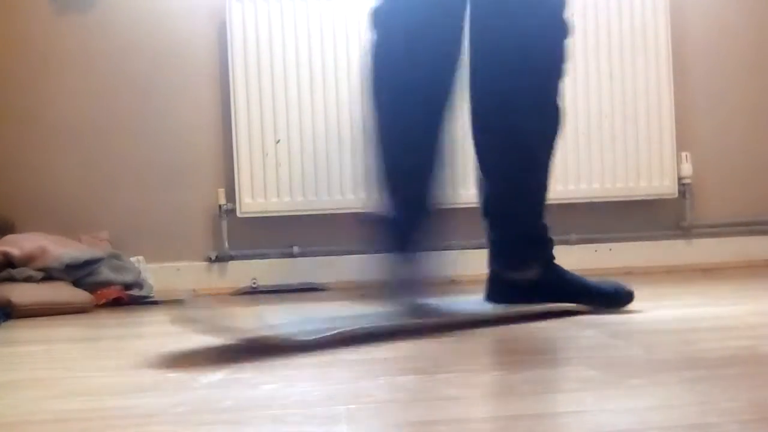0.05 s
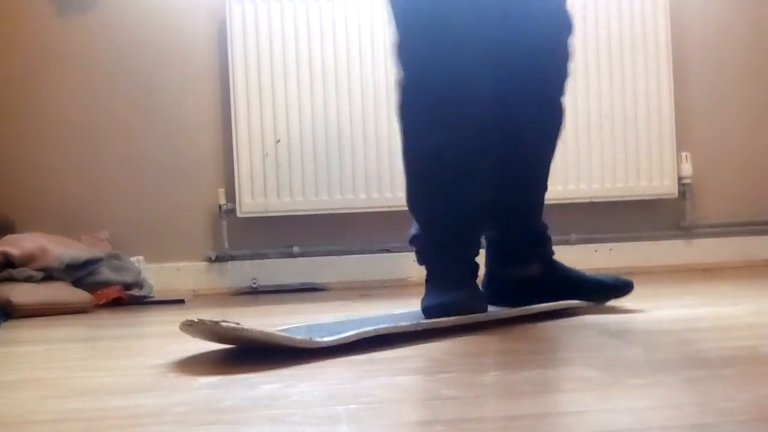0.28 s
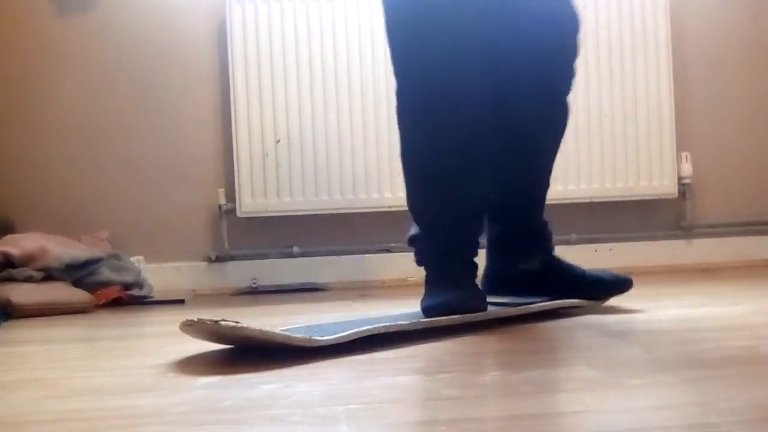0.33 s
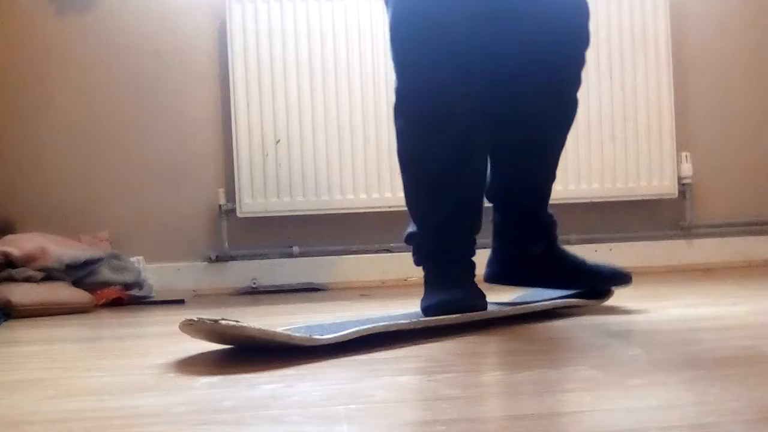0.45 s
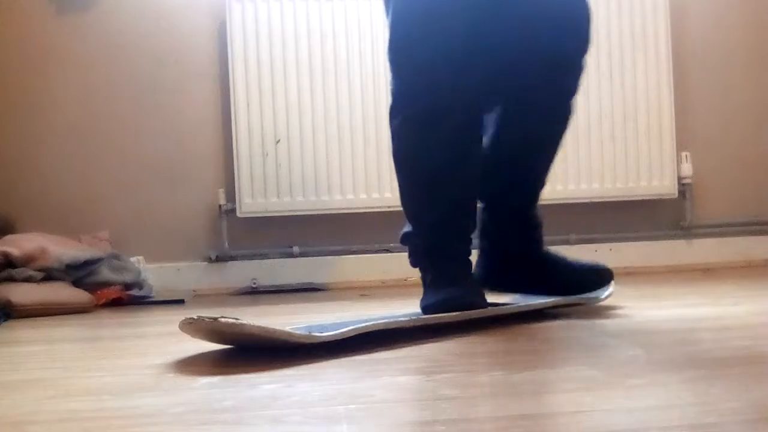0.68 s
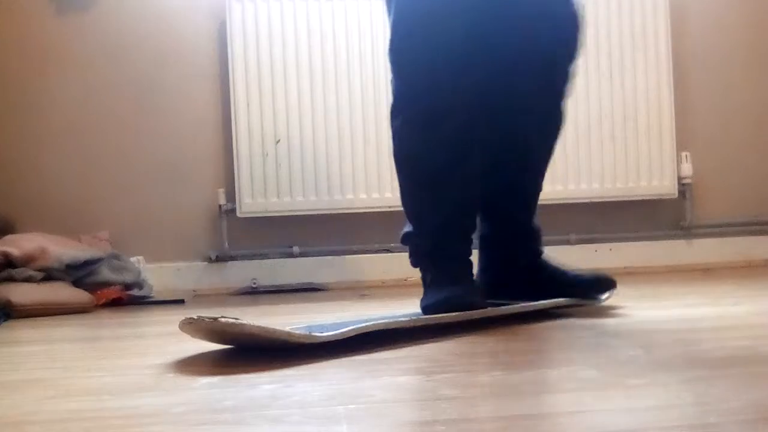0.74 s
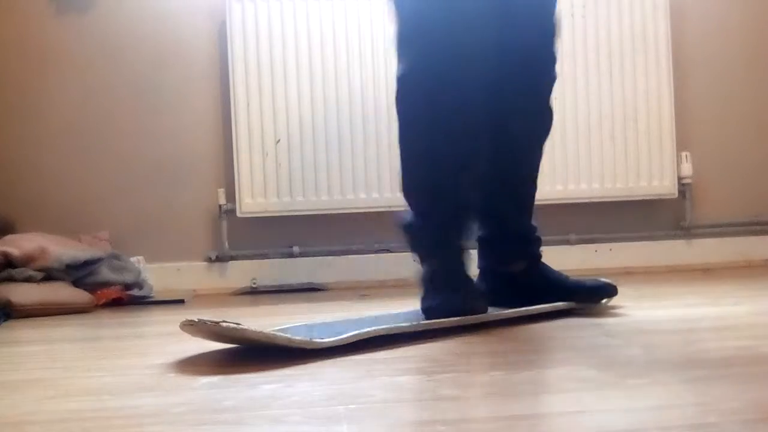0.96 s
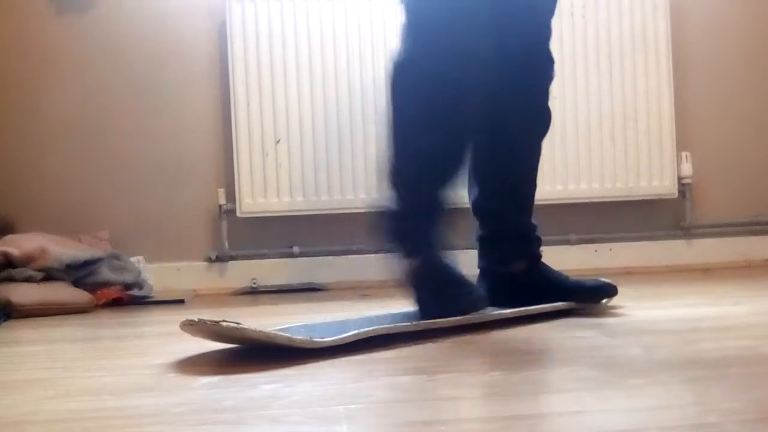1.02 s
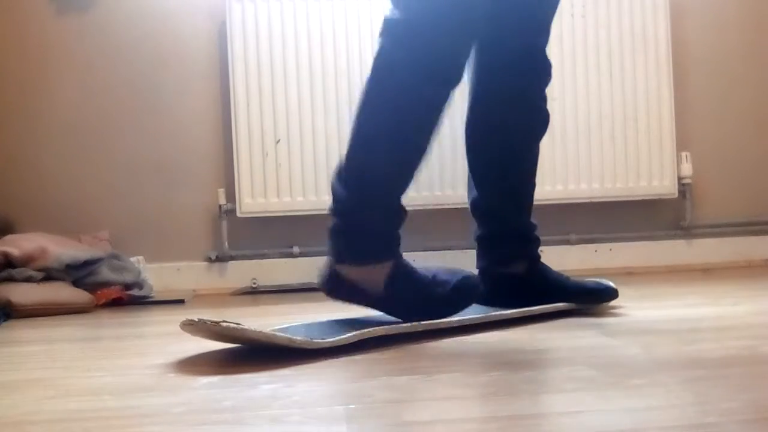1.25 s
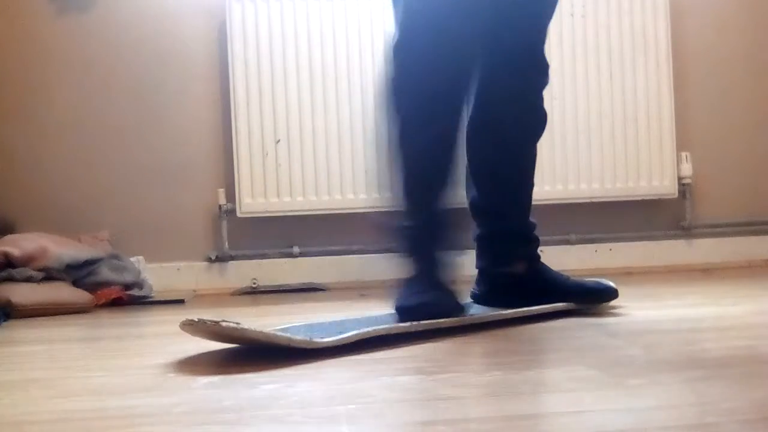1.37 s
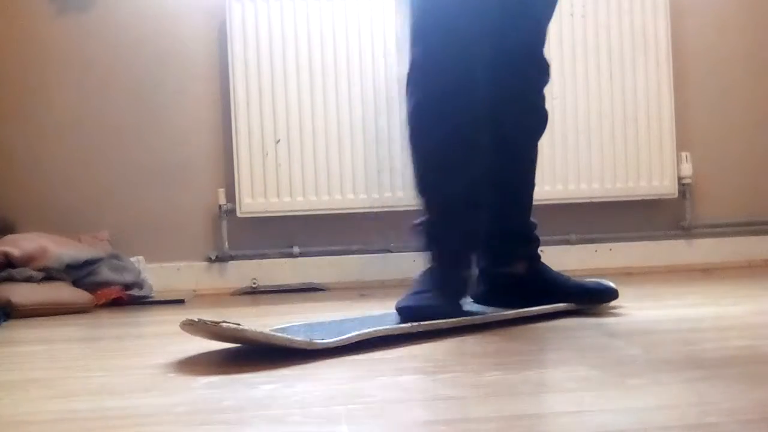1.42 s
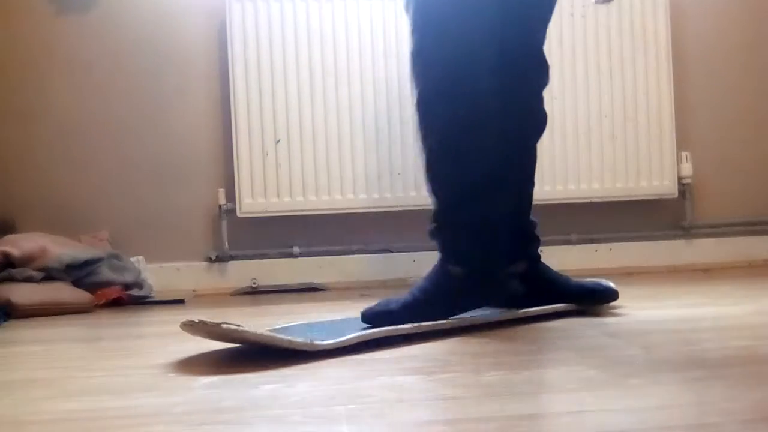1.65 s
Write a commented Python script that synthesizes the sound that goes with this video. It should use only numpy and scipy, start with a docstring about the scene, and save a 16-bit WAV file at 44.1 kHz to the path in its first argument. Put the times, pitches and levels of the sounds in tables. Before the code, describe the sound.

A bare wooden skateboard deck clatters on a hard floor in a small room. A sole scuffs its gritty top at 0 s, then six hard, woody knocks rattle together at 0.12-0.17 s. The underside scrapes to rest until about 0.75 s, with a soft double tap at 0.78 s. A short squeaky scuff follows at 1.1 s, then a stronger one at 1.36-1.7 s with a faint footfall. Steady hiss and a thin, faint whine continue throughout.

```python
"""A bare wooden skateboard deck on a hard floor in a small room, over steady hiss and a thin wavering whine.
At once a sole drags on the gritty top: uneven noise rings deck modes, and catches sing as brief tones.
The deck clatters down in a quick run of six blows, each a first contact and its rattle exciting modes.
Its underside slides to rest as noise through sagging modes, and it taps once more in a close pair of blows.
Then the sole drags twice again with further squeaks, a soft footfall sounding within the last drag."""
import sys
import numpy as np
from scipy import signal
from scipy.fft import rfft, irfft, next_fast_len
from scipy.io import wavfile
from scipy.ndimage import map_coordinates

SR = 44100
rng = np.random.default_rng(int(sys.argv[2]) if len(sys.argv) > 2 else 0)


def to_linear_factor(level_db):
    """Convert decibel levels (scalar or array-like) to linear amplitude factors."""
    exponent = np.asarray(level_db, float) / 20
    return 10 ** exponent


def generate_wav(sig):
    """Save sig (samples, or channels by samples) to the path in sys.argv[1] as 16-bit PCM at SR."""
    pcm = np.round(np.clip(np.atleast_2d(sig).T, -1, 1) * 32767).astype(np.int16)
    wavfile.write(sys.argv[1], SR, pcm)


N = 74970

# Levels are those given to each source, ahead of the room tail and the microphone.
# Steady hiss, relative spectrum: (frequency [Hz], level [dB])
HISS_SPECTRUM = [(20, -30), (60, -21.5), (150, 7), (700, -5.5), (1400, 8.5), (3000, -4.5), (6000, -1.5),
                 (12000, 8.5), (16000, -1.5)]
# Sole dragging on the grip, level before the tilt: (time [s], level [dB], brightness [dB/octave])
SCUFF_STROKE = [(0, -46.5, 2.5), (.05, -52.5, 0.5), (.092, -54.5, 1.5), (.104, -43, 2.5), (.15, -35, -4),
                (.25, -50, -2), (.36, -64, 5.5), (.9, -69, -5), (1.03, -74.5, 3.5), (1.07, -68, -1),
                (1.094, -56, -0.5), (1.104, -53.5, -0.5), (1.155, -53, 0.5), (1.2, -63.5, -1.5),
                (1.238, -78, 8), (1.262, -88, -6), (1.335, -75, -5), (1.356, -59, 0), (1.364, -51, -1.5),
                (1.4, -46.5, 0), (1.435, -42.5, 1), (1.48, -46.5, 1), (1.55, -50, 2.5), (1.62, -54.5, 0),
                (1.7, -63, 3.5)]
# Deck modes rung by the sole: (frequency [Hz], width [Hz], level [dB])
SCUFF_MODES = [(500, 56, -6.5), (720, 42, -11), (1196, 48, -6.5), (1350, 38, -2.5), (1586, 340, -4.5),
               (2390, 327, -5), (2900, 210, -6), (3480, 750, -11.5)]
# Modes that lead once the foot's weight has shifted: (frequency [Hz], width [Hz], level [dB])
SCUFF_LATE_MODES = [(528, 71, -2), (1266, 190, 3), (1734, 300, 1), (2550, 1100, -4), (3620, 740, -7)]
# Unresonated rubbing, relative spectrum: (frequency [Hz], level [dB])
RUB_SPECTRUM = [(100, -120), (250, -3), (500, 1), (1500, -0.5), (3000, -4), (6000, -11), (16000, -23)]
# Catches of the sole, mean pitch and level: (time [s], length [s], pitch [Hz], rms level [dB])
SQUEAK_EVENTS = [(0, 0.04, 2320, -56), (1.064, 0.0092, 2460, -63), (1.067, 0.0057, 1350, -62),
                 (1.094, 0.032, 1350, -52), (1.1, 0.019, 1186, -55), (1.112, 0.012, 500, -64),
                 (1.134, 0.023, 500, -62), (1.157, 0.0134, 539, -66.5), (1.209, 0.028, 1350, -64),
                 (1.356, 0.006, 1340, -51.5), (1.367, 0.012, 1350, -46.5), (1.385, 0.0091, 482.8, -49.5),
                 (1.409, 0.016, 1277, -48.5), (1.421, 0.014, 2480, -56)]
# Moments of the blows, deck on floor, and last a soft footfall: (time [s])
BLOW_TIMES = [.1184, .1343, .1512, .152, .1565, .166, .7737, .7853, 1.372]
# Blows, one per moment: (peak [dB], favoured mode region [Hz], low thud peak [dB],
# rattle decay time [s], crack peak relative to the blow [dB])
BLOWS = [(-21, 1360, -57, 0.00305, -7.5), (-29, 2000, -62, 0.0046, -32), (-15, 1790, -78, .012, -9),
         (-25, 600, -34.5, 0.00404, -41), (-25.5, 550, -52.5, .006, -42), (-26.5, 463, -43.5, .02, -37),
         (-35, 1080, -69.5, 0.0063, -36), (-37, 630, -61, 0.016, -40), (-45.5, 450, -63.5, 0.0338, -38)]
# Slow low modes of deck and floor: (frequency [Hz], width [Hz], level [dB])
THUD_MODES = [(174.3, 14.3, 3), (222.8, 12, 0.5), (344.6, 13.7, -3.5)]
# Struck deck modes, before weighting by region: (frequency [Hz], width [Hz], level [dB])
DECK_MODES = [(389.5, 15, 1.5), (484, 48, -3), (570, 84, -6), (660, 100, 4), (850, 480, 2), (1120, 140, -6),
              (1340, 126, 7.5), (1623, 65, 0), (1850, 350, -0.5)]
# Ring of the hard contact: (frequency [Hz], width [Hz], level [dB])
CRACK_MODES = [(4640, 1100, 5), (6870, 2300, 5), (12560, 17600, -3.5)]
# Underside rubbing the floor, level before the tilt: (time [s], level [dB], brightness [dB/octave])
SLIDE_STROKE = [(.12, -108, 13), (.2, -61, 9.5), (.34, -54, -5), (.4, -51, 1), (.435, -49, 0.5),
                (.47, -50.5, 1), (.53, -53.5, -0.5), (.57, -54.5, -3.5), (.6, -60.5, -1), (.63, -54, -2),
                (.65, -59, -1), (.685, -56.5, 2), (.72, -64.5, 6), (.77, -69, -3), (.84, -83, 0)]
# Deck modes rung at the start of the slide: (frequency [Hz], width [Hz], level [dB])
SLIDE_MODES = [(634, 107, -9.5), (830, 154, -7), (1160, 400, -12.5), (1728, 136, 0.5), (2196, 68, -2),
               (2740, 130, -12), (3506, 71, -13.5)]
# Reverberation time of the room: (frequency [Hz], time to fall 60 dB [s])
ROOM_T60 = [(150, 0.51), (500, 0.27), (1500, 0.43), (4000, 0.51), (10000, 0.34)]
# Microphone response: (frequency [Hz], gain [dB])
MIC_RESPONSE = [(20, 24.5), (90, 15), (170, 4), (5500, -2), (6500, -6), (7500, -18.5), (9000, -22),
                (13800, -25.5), (15000, -1.5), (15500, -18)]


def unit(x):
    """Normalisation: scales a signal to an rms of 1."""
    return x / np.sqrt(np.mean(x ** 2) + 1e-20)


def peak_unit(x):
    """Normalisation: scales a signal to a peak of 1."""
    return x / np.abs(x).max()


def along(points, hz):
    """Linear interpolation of a tabulated curve over logarithmic frequency."""
    f, value = np.transpose(points)
    return np.interp(np.log(hz + 1), np.log(f + 1), value)


def filtered(x, response):
    """Linear filtering: the spectrum is multiplied by a complex response of frequency."""
    size = next_fast_len(len(x) + SR // 2)
    spectrum = rfft(x, size) * response(np.fft.rfftfreq(size, 1 / SR))
    return irfft(spectrum, size)[:len(x)]


def modes(table, flip=-1):
    """Modal superposition: a causal sum of damped resonances; flip -1 alternates their signs."""
    def response(f):
        total = 0
        for k, (centre, width, db) in enumerate(table):
            damping = 1j * f * width
            total = total + flip ** k * to_linear_factor(db) * damping / (centre * centre - f * f + damping)
        return total
    return response


def low_pass(u):
    """Second-order Butterworth roll-off over the ratio u of frequency to cut-off."""
    return 1 / (1 - u * u + np.sqrt(2) * 1j * u)


def high_pass(u):
    """Second-order Butterworth rise over the ratio u of frequency to cut-off."""
    return -u ** 2 * low_pass(u)


def wobble(rate):
    """Band-limited random modulation: a smooth curve through Gaussian knots, rate of them a second."""
    knots = rng.standard_normal(int(N * 200 / SR) + 4)
    return map_coordinates(knots, [np.arange(N) * min(rate, 199) / SR])


def room(x, wet_db):
    """Reverberation: direct sound plus a delayed diffuse tail decaying by frequency."""
    first_wall_s = 0.0066
    hz, t, z = signal.stft(rng.standard_normal(SR // 2), SR, nperseg=256)
    decay = to_linear_factor(-60 * t / along(ROOM_T60, hz)[:, None])
    tail = signal.istft(z * decay, SR, nperseg=256)[1]
    tail = tail / np.linalg.norm(tail)
    delayed = np.pad(x, (round(first_wall_s * SR), 0))
    return x + to_linear_factor(wet_db) * signal.fftconvolve(delayed, tail)[:N]


def background():
    """Stationary shaped noise, and a sinusoid whose level and phase waver."""
    hiss_db, whine_hz, whine_db, whine_waver_db = -64, 6230, -78.5, 3
    hiss = unit(filtered(rng.standard_normal(N), lambda f: to_linear_factor(along(HISS_SPECTRUM, f))))
    waver = to_linear_factor(whine_waver_db * wobble(25.5))
    phase = 2 * np.pi * whine_hz * np.arange(N) / SR + 0.5 * wobble(35)
    whine = np.sqrt(2) * waver * np.sin(phase)
    return to_linear_factor(hiss_db) * hiss + to_linear_factor(whine_db) * whine


def grit(spread_db):
    """Asperity contact: dense noise whose strength steps unevenly every 8 samples."""
    strength = np.minimum(rng.exponential(size=N // 8 + 1), 4).repeat(8)[:N]
    return rng.standard_normal(N) * to_linear_factor(spread_db * strength)


def rubbing(stroke, ring, late_ring, shift_s, broad_db, above_hz, grit_db, catch_db):
    """Sliding friction: uneven grit noise partly rings the deck, its level and brightness set by the stroke."""
    s, level_db, tilt_db = np.transpose(stroke)
    seconds = np.arange(N) / SR
    grip = grit(grit_db) * to_linear_factor(catch_db * wobble(90))
    late = np.interp(seconds, shift_s, [0, 1])
    early_rung = unit(filtered(grip, modes(ring)))
    late_rung = unit(filtered(grip, modes(late_ring)))
    rung = (1 - late) * early_rung + late * late_rung
    scrape = grit(grit_db) * to_linear_factor(catch_db * wobble(40.5))
    broad = unit(filtered(scrape, lambda f: to_linear_factor(along(RUB_SPECTRUM, f))))
    hz, t, z = signal.stft(unit(rung + to_linear_factor(broad_db) * broad), SR, nperseg=512)
    octaves = np.log2(np.clip(hz, 200, 6000) / 1500)[:, None]  # the tilt pivots at 1500 Hz
    tilt = to_linear_factor(np.interp(t, s, tilt_db) * octaves)
    bass_cut = 1 + (above_hz / (hz[:, None] + 1)) ** 6
    rub = signal.istft(z * tilt / bass_cut, SR, nperseg=512)[1][:N]
    return to_linear_factor(np.interp(seconds, s, level_db, left=-120)) * rub


def scuff():
    """Friction of sole on grip; late in the last drag the shifted weight makes other modes lead."""
    return rubbing(SCUFF_STROKE, SCUFF_MODES, SCUFF_LATE_MODES, shift_s=(1.438, 1.53),
                   broad_db=-4.5, above_hz=300, grit_db=4.0, catch_db=3.0)


def squeaks():
    """Stick-slip tones: the sole catches and one deck mode sings briefly, wavering, with soft edges."""
    edge_s, waver_db, waver_hz = 0.002, 2, 25
    t, out = np.arange(N) / SR, np.zeros(N)
    for s, length_s, hz, db in SQUEAK_EVENTS:
        attack = np.clip((t - s) / edge_s, 0, 1)
        release = np.exp(-np.clip(t - s - length_s, 0, None) / edge_s)
        phase = 2 * np.pi * np.cumsum(hz + waver_hz * wobble(80)) / SR
        level = np.sqrt(2) * to_linear_factor(db + waver_db * wobble(140))
        out += level * attack * release * np.sin(phase)
    return out


def struck_deck(start, place_hz, rattle_s):
    """Impact excitation of modes: a first contact and a dying rattle ring the deck around place_hz."""
    contacts, rattle_db = 14, -1.5
    falloff_db = -10  # per squared octave away from the favoured region
    draw, blows = rng.random((contacts, 2)), np.zeros(N)
    late = 0.000695 + 2 * rattle_s * draw[:, 0]  # delay of each smaller contact [s]
    strength = to_linear_factor(rattle_db) * np.exp(-late / rattle_s) * (2 * draw[:, 1] - 1)
    np.add.at(blows, np.round((start + late) * SR).astype(int), strength)
    blows[round(start * SR)] = 1
    weighted = [(c, w, g + falloff_db * np.log2(c / place_hz) ** 2) for c, w, g in DECK_MODES]
    ring = modes(weighted, flip=1.0)
    # the ring is thin below the region; the soft contact cuts off above it
    return filtered(blows, lambda f: ring(f) * high_pass(f / (0.6 * place_hz))
                    * low_pass(f / (1.6 * place_hz)) ** 2)


def thud(start):
    """Impulse response of the low modes; the deck radiates little below the cut-off."""
    radiates_hz = 150
    impulse = 1. * (np.arange(N) == round(start * SR))
    return filtered(impulse, lambda f: modes(THUD_MODES)(f) * high_pass(f / radiates_hz) ** 2)


def crack(start):
    """Hard-contact transient: an exponentially decaying noise burst rings high modes."""
    crack_s = 0.0035  # decay time of the burst
    t, burst = np.arange(SR // 50) / SR, np.zeros(N)
    burst[round(start * SR):][:len(t)] = np.exp(-t / crack_s) * rng.standard_normal(len(t))
    return filtered(burst, modes(CRACK_MODES))


def impacts():
    """Superposition of impacts: each blow or footfall sums struck deck, thud and crack, with room tails."""
    blow_room_db, crack_room_db = -3, 0
    out = np.zeros(N)
    for start, (db, place_hz, thud_db, rattle_s, crack_db) in zip(BLOW_TIMES, BLOWS):
        hit = to_linear_factor(db) * peak_unit(struck_deck(start, place_hz, rattle_s))
        low = to_linear_factor(thud_db) * peak_unit(thud(start))
        out += room(hit + low, blow_room_db)
        out += to_linear_factor(db + crack_db) * room(peak_unit(crack(start)), crack_room_db)
    return out


def slide():
    """Friction of underside on floor; the ringing modes sag in pitch and narrow near the end."""
    slowed = [(0.96 * centre, 0.63 * width, db) for centre, width, db in SLIDE_MODES]
    return rubbing(SLIDE_STROKE, SLIDE_MODES, slowed, shift_s=(0.65, 0.68),
                   broad_db=-19.5, above_hz=500, grit_db=2.0, catch_db=-1.0)


def scene():
    """Linear superposition: rubbing, squeaks and impacts in the room, over the background."""
    rubs = room(scuff() + slide(), wet_db=-6.5)
    mix = background() + rubs + room(squeaks(), wet_db=-12) + impacts()
    return mix[None]


def top_cut(x):
    """Nothing passes above the cut-off."""
    return signal.sosfilt(signal.butter(12, 15680, fs=SR, output="sos"), x)


def record(dry):
    """Transducer response: lifted bass, dull above 7 kHz but for a narrow peak near 15 kHz, then a cut-off."""
    top_hz = 15560
    mix = filtered(dry[0], lambda f: to_linear_factor(along(MIC_RESPONSE, f)) * (f < top_hz))[None]
    return top_cut(mix)


dry = scene()
out = record(dry)
generate_wav(out)
```